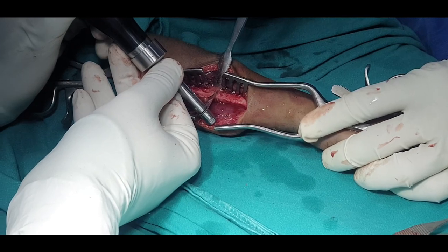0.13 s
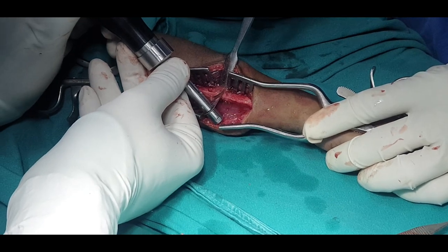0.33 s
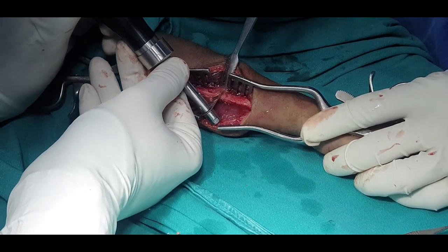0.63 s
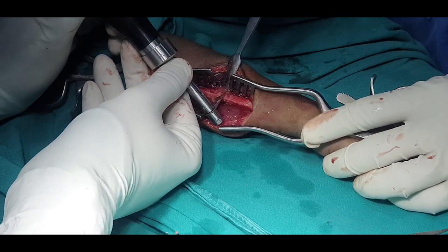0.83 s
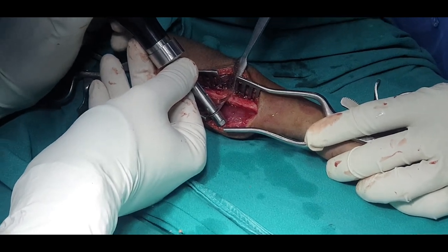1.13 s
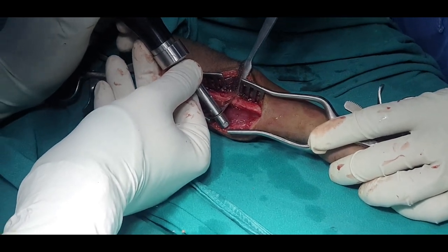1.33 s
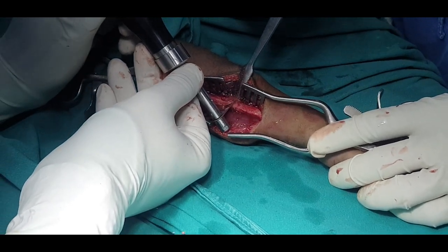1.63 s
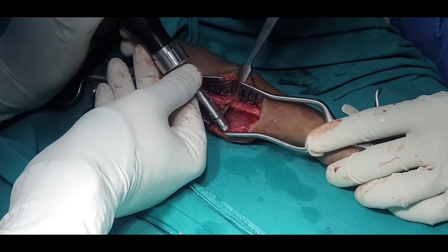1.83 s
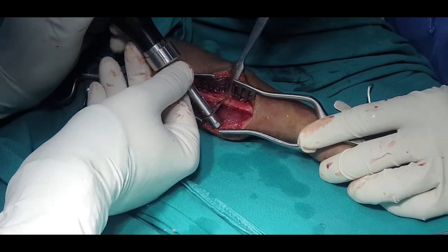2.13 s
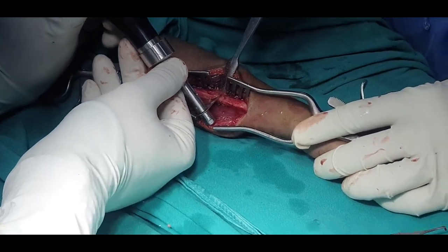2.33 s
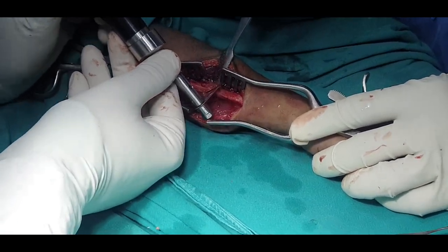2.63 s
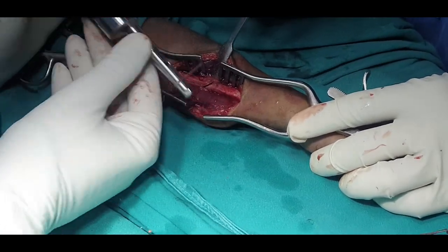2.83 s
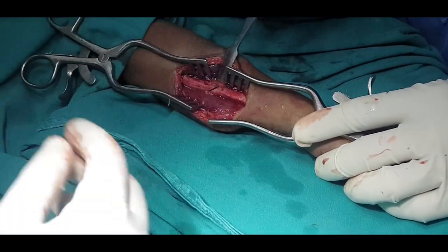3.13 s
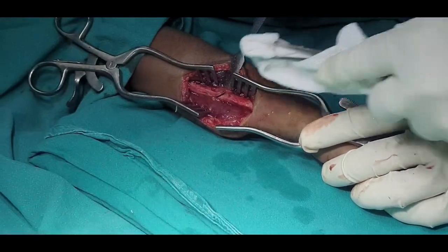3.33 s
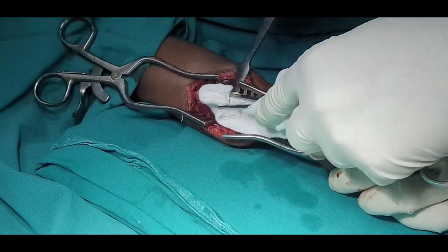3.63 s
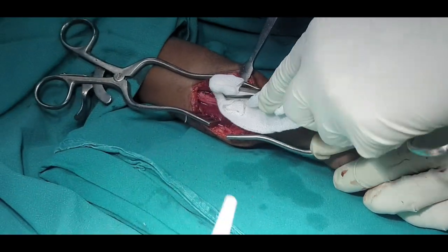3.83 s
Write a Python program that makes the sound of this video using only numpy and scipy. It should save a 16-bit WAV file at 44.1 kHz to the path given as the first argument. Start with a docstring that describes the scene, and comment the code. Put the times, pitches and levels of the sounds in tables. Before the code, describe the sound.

A powered surgical drill buzzes against bone in bursts, then whirs down with hissing air

```python
"""Air-driven surgical drill on bone

The drill runs close by and is pressed on bone four times firmly and once lightly: pulses timed by the rotor's
turns make the bright buzz, the motor sags, and coloured noise adds a screech and the hiss of exhaust air.
On release the rotor coasts down in pitch and level and the air bleeds away.
Beneath lie short, soft low swells, ventilation noise and a throbbing hum; sparse reflections follow the drill."""
import sys
import numpy as np
from scipy import signal
from scipy.fft import rfft, irfft
from scipy.io import wavfile
from scipy.ndimage import uniform_filter1d

SR = 44100
rng = np.random.default_rng(int(sys.argv[2]) if len(sys.argv) > 2 else 0)


def persist_wave(psi):
    """Save psi, clipped to +-1, as 16-bit WAV."""
    counts = np.round(np.clip(psi, -1, 1) * 32767).astype(np.int16)
    wavfile.write(sys.argv[1], SR, np.atleast_2d(counts).T)


N = 176400
T = np.arange(N) / SR
RELEASE_S = 3.16  # trigger let go


def amp(db):
    """Decibels to gain."""
    return 10 ** (np.asarray(db) / 20)


def curve(points):
    """A control joined by straight lines in time."""
    return np.interp(T, *np.transpose(points))


def sides(table, at):
    """Left and right gain read from a table of levels."""
    x, left, right = np.transpose(table)
    return amp([np.interp(at, x, left), np.interp(at, x, right)])


def swell(centre_s, width_s):
    """Bell-shaped rise and fall around a moment."""
    return np.exp(-.5 * ((T - centre_s) / width_s) ** 2)


def wander(rate_hz):
    """Slow random drift of unit RMS: noise under a Gaussian low-pass, computed at a coarse step."""
    step = 2 ** 5
    count = N // step + 2
    hz = np.fft.rfftfreq(count, step / SR)
    lowpass = np.exp(-.5 * (hz / rate_hz) ** 2)
    drift = irfft(rfft(rng.standard_normal(count)) * lowpass)
    return np.interp(T, np.arange(len(drift)) * step / SR, drift / drift.std())


def air(table, same, patchy_db, size=1024):
    """Turbulence as coloured noise, partly alike on both sides, with smooth patches in time and pitch."""
    frames, hz = N * 4 // size + 5, np.fft.rfftfreq(size, 1 / SR)
    a, b, c, d, patches = rng.standard_normal((frames, size // 2 + 1, 5)).T
    for axis in (0, 1):
        patches = uniform_filter1d(patches, size=10, axis=axis)
    same = np.clip(same, -1, 1)
    left = a + 1j * b
    right = same * left + np.sqrt(1 - same ** 2) * (c + 1j * d)
    spectrum = np.array([left, right]) * sides(table, hz)[:, :, None]
    spectrum *= amp(patchy_db * patches / patches.std())
    noise = signal.istft(spectrum, nperseg=size, noverlap=size * 3 // 4)[1][:, :N]
    return np.sqrt(2 ** 11 / size) * noise  # same loudness for any frame size


def theatre():
    """Operating room: lumpy ventilation rumble and a throbbing machine hum."""
    # ventilation spectrum: f/Hz, left level/dB, right level/dB, before its wavering
    vent = [(20, -94, -90), (54.6, -70, -68.5), (86.5, -74, -59), (114.5, -54.5, -53.5), (150, -80, -63),
            (200, -66.5, -63.5), (280, -97, -93.5), (433, -86, -79.5), (650, -101, -98.5),
            (1290, -104, -107), (4000, -96, -99), (15000, -98, -100)]
    rumble = air(vent, same=.55, patchy_db=1.5, size=4096) * amp(3.94 * wander(17))

    hum_hz, throb_hz, throb_depth = 100.6, 16.4, 0.94
    throb = 1 + throb_depth * np.cos(2 * np.pi * throb_hz * T + 1.4 * wander(4.9))
    level = amp(-52 + 1.86 * wander(12)) * throb
    hum = level * np.sin(2 * np.pi * hum_hz * T + 0.48 * wander(6.1))
    return rumble + hum * amp([[-4.5], [2]])  # hum leans right


def low_swells():
    """Short, soft low swells in the room noise: low tones under a bell envelope, stronger on the right."""
    # swells: t/s, right-side level/dB, f/Hz
    moments = [(.06, -44.5, 364), (.61, -46.5, 278), (.651, -43.5, 200), (.957, -41.5, 185),
               (1.03, -48.5, 364), (1.334, -46, 207), (1.597, -45.5, 202), (1.661, -44, 357),
               (1.93, -44, 184), (1.987, -44.5, 315), (2.13, -50, 249), (2.191, -45.5, 338)]
    width_s = 0.011
    swells = sum(amp(db) * swell(s, width_s) * np.sin(2 * np.pi * hz * (T - s)) for s, db, hz in moments)
    return swells * amp([[-6], [0]])


def speed():
    """Turns per second: the motor sags under load and slows exponentially after the release."""
    # rotor speed before the coast-down: t/s, f/Hz (turns per second)
    turn_rate = [(0, 487.8), (0.23, 487.5), (0.32, 482.2), (0.4, 480.5), (0.47, 480.7), (0.52, 487.5),
                 (0.7, 489.0), (0.8, 482.5), (0.9, 480.5), (1.0, 484.7), (1.16, 488.3), (1.26, 483.4),
                 (1.4, 479.9), (1.72, 477.7), (1.97, 477.2), (2.04, 485.7), (2.13, 490.9), (2.25, 490.4),
                 (2.4, 480.1), (2.55, 476.6), (2.67, 477.2), (2.72, 486.1), (2.8, 490.7), (3.05, 493.0),
                 (3.16, 491.2)]
    coast_s = 0.95
    return curve(turn_rate) * np.exp(-np.maximum(T - RELEASE_S, 0) / coast_s)


def rotor(jitter=0.00072):
    """Turns made so far: the slightly unsteady speed summed over time."""
    return np.cumsum(speed() * (1 + jitter * wander(70))) / SR


def contact():
    """Force of the bur on the bone, ramping in as it bites and out as it lifts."""
    # presses: start t/s, start of lift t/s, level/dB, lift time/s
    presses = [(0.197, 0.44, 0, 0.056), (0.666, 0.883, -.5, 0.12), (1.145, 1.871, 2, 0.16),
               (2.242, 2.633, -.5, 0.067), (2.728, 2.8, -7, 0.035)]
    bite_s = 0.072
    force = 0
    for start, end, db, lift in presses:
        bite = np.clip((T - start) / bite_s, 0, 1)
        force = force + amp(db) * bite * np.clip(1 - (T - end) / lift, 0, 1)
    return force


def thinned(hiss, size=1024):
    """Thins the lower hiss between multiples of the speed, more under load, until the end time."""
    thin_db, thin_load_db = -11, -14
    thin_end_s, thin_fade_s = 3.6, .35
    thin_top_hz = 3480  # untouched above this
    hz, t, spectrum = signal.stft(hiss, SR, nperseg=size, noverlap=size * 3 // 4)
    cut_db = (thin_db + thin_load_db * contact()) * np.clip((thin_end_s - T) / thin_fade_s, 0, 1)
    between = np.sin(np.pi * hz[:, None] / np.interp(t, T, speed())) ** 2  # 0 on a multiple, 1 midway
    reach = np.clip(2 - 2 * hz / thin_top_hz, 0, 1)[:, None]
    spectrum = spectrum * amp(np.interp(t, T, cut_db) * reach * between)
    return signal.istft(spectrum, SR, nperseg=size, noverlap=size * 3 // 4)[1][:, :N]


def exhaust():
    """Hiss of spent air, a bright band swelling as the drill turns away, then a thinner bleed-off."""
    # spectra before flow, thinning and fades: f/Hz, left level/dB, right level/dB
    full_flow = [(700, -135, -141), (1356, -78, -77), (1820, -75, -58.5), (2100, -78, -54.5),
                 (3150, -60, -59), (3090, -58, -57), (4110, -76, -46.5), (4750, -56, -53), (5300, -69, -51),
                 (5900, -61.5, -52), (7230, -60, -52), (8070, -72, -52), (8830, -48.5, -59.5),
                 (9430, -44.5, -54), (10730, -54.5, -53.5), (12000, -54, -53), (13100, -59, -57.5),
                 (15300, -61, -69)]
    emptying = [(616, -70, -65), (1350, -84, -70.5), (2100, -70.5, -64.5), (3740, -74, -64.5),
                (4250, -70, -52), (5180, -73, -61.5), (6300, -77, -62), (7240, -71, -61),
                (8200, -77, -71.5), (9500, -62, -73), (10500, -77, -73), (11600, -66, -62),
                (12400, -72, -78), (14300, -80, -79)]
    drawn_away = [(5200, -100, -92), (6130, -78, -48), (7000, -50, -44), (7040, -56, -68), (8100, -99, -87)]
    # flow of air: t/s, level/dB
    flow_level = [(0, 2), (1.25, 2.5), (1.6, 0.5), (2.0, 1), (2.8, 2.5), (3.15, 0.5), (3.27, -3.5),
                  (3.45, -7.5), (3.6, -17), (4, -34)]
    bleed_db, bleed_db_per_s = -3, 10.5  # level at 4 s, and its fall
    onset = np.clip((T - RELEASE_S) / 0.17, 0, 1) ** 2
    bleeding = onset * amp(bleed_db - bleed_db_per_s * (T - 4.0))
    flow = amp(curve(flow_level) + .5 * wander(23))
    hiss = flow * air(full_flow, same=0.04, patchy_db=2.0)
    hiss += bleeding * air(emptying, same=0.12, patchy_db=2.5)
    turned = swell(3.08, 0.13) * air(drawn_away, same=0.16, patchy_db=2.0)
    return thinned(hiss) + turned


def room(x):
    """Sparse random reflections, the treble dying first."""
    # decay of the reflections: f/Hz, t60/s
    decay = [(300, 0.34), (3000, 0.26), (14000, 0.045)]
    taps = rng.choice([-1., 1.], (2, SR)) * (rng.random((2, SR)) < 3000 / SR)  # about 3000 a second
    taps *= T[:SR] > .003
    hz, t, spectrum = signal.stft(taps, SR, nperseg=256)
    t60 = np.interp(hz, *np.transpose(decay))[:, None]
    tail = signal.istft(spectrum * amp(-60 * t / t60), SR, nperseg=256)[1]
    return signal.fftconvolve(x, tail / np.linalg.norm(tail[0]), axes=1)[:, :N]


def pulses(turns, gains, waver_db, waver_hz, scatter, fuzz, fuzz_hz, count):
    """Once-a-turn pulses as a sum of multiples, each slightly blurred by random wavering."""
    # the moving hand shifts the tones between the sides, the higher multiples more
    drift_rad, drift_multiple, drift_hz = 0.98, 11, 1.2
    out = np.zeros((2, N))
    for k in range(count):
        wave = amp(waver_db * wander(waver_hz)) * np.exp(2j * np.pi * (k + 1) * turns)
        wave = wave * (1 + fuzz * (wander(fuzz_hz) + 1j * wander(fuzz_hz)))
        drift = drift_rad * np.tanh((k + 1) / drift_multiple) * wander(drift_hz)
        lag = scatter * rng.standard_normal() + np.array([drift, -drift])
        out += gains(k) * (wave * np.exp(1j * lag)).real
    return out


def motor(turns):
    """Vanes chop the air, a whine rises shortly before the release, and upper tones die first in the coast."""
    # multiples 1, 2, 3.. of the speed, before trim, load and coast: left level/dB, right level/dB
    tones = [(-57, -48), (-47.5, -50), (-53, -47.5), (-48, -42.5), (-47, -41), (-50, -44.5), (-60, -42),
             (-48, -37), (-60, -34.5), (-50, -38), (-51, -43)]
    # whine of the eighth multiple before the coast: t/s, right-side level/dB
    whine_level = [(0, -71), (2.75, -42), (3.03, -24.5), (3.16, -24), (3.2, -32), (3.4, -52)]
    coast_db_per_s, coast_db_per_multiple_s = 22, 15
    clear_s, clear_db, clear_fade_s = 2.674, -14.5, 0.22  # lowest tone weakens as the drill is drawn clear
    coasting = np.maximum(T - RELEASE_S, 0)
    clearing_db = clear_db * np.clip((T - clear_s) / clear_fade_s, 0, 1)

    def colour(k):
        """Level of one multiple on each side."""
        fade_db = clearing_db * (k == 0) - coast_db_per_multiple_s * k * coasting
        return amp(tones[k])[:, None] * amp(fade_db)

    tone = pulses(turns, colour, waver_db=2.1, waver_hz=11, scatter=1.99, fuzz=0.38, fuzz_hz=28.7,
                  count=len(tones))
    tone *= amp(-0.5 + contact())  # about a decibel louder under load
    whine = amp(curve(whine_level)) * np.cos(2 * np.pi * 8 * turns)
    return (tone + whine * amp([[-13], [0]])) * amp(-coast_db_per_s * coasting)


def bur(turns, rough=0.11):
    """Uneven strikes on bone, a buzz blending between two colours, with a grinding screech and squeaks."""
    # blend of the buzz: t/s, share of the second colour (0 to 1)
    colour_blend = [(0, 0.79), (1.58, 0.041), (1.8, 1), (2.3, 0.12), (2.52, 1)]
    # buzz at multiples 1, 2, 3.. of the speed, before trim and force: left level/dB, right level/dB
    first_colour = [(-55, -47), (-48, -45), (-49, -45), (-43, -32), (-49, -41), (-50, -35), (-45, -35),
                    (-51, -46), (-48, -33), (-53, -31), (-45, -32), (-43, -31), (-42, -31), (-43, -30),
                    (-50, -35), (-53, -40), (-47, -41), (-28, -45), (-21, -41), (-32, -34), (-28, -44),
                    (-27, -31), (-29, -32), (-44, -34), (-36, -39), (-38, -34), (-41, -36), (-43, -40),
                    (-44, -49), (-43, -44)]
    second_colour = [(-54, -45), (-46, -44), (-46, -43), (-43, -33), (-43, -35), (-47, -35), (-45, -36),
                     (-50, -40), (-46, -30), (-55, -34), (-48, -30), (-40, -34), (-44, -38), (-46, -28),
                     (-48, -37), (-45, -32), (-41, -41), (-40, -44), (-26, -42), (-26, -39), (-25, -40),
                     (-26, -32), (-32, -30), (-35, -34), (-38, -35), (-40, -38), (-44, -37), (-37, -35),
                     (-41, -36), (-43, -43)]
    # screech of ground bone, before force: f/Hz, left level/dB, right level/dB
    screech_colour = [(3000, -112.5, -104.5), (5800, -69, -75), (8200, -61, -57), (9250, -57, -66),
                      (9800, -43.5, -74), (11200, -66, -67), (14300, -58, -58)]
    # squeaks as the bur skids: t/s, right-side level/dB
    skids = [(1.005, -27), (1.972, -22)]
    squeak_hz, squeak_s = 4353, 0.0067
    blend = curve(colour_blend)

    def colour(k):
        """Level of one multiple on each side, between the two colours."""
        return sides([(0, *first_colour[k]), (1, *second_colour[k])], blend)

    buzz = pulses(turns, colour, waver_db=1.25, waver_hz=3.5, scatter=0.92, fuzz=0.21, fuzz_hz=37.7,
                  count=len(second_colour))
    buzz *= amp(-0.5) * (1 + rough * wander(61))
    once_a_turn = 1 + .5 * np.cos(2 * np.pi * turns)
    screech = air(screech_colour, same=0.033, patchy_db=-4.0) * once_a_turn
    squeaks = sum(amp(db) * swell(s, squeak_s) for s, db in skids) * np.sin(2 * np.pi * squeak_hz * T)
    return contact() * (buzz + screech) + squeaks * amp([[-12], [0]])


def scene():
    """Room tone, low swells and air around the drill and its reflections."""
    turns = rotor()  # bur and motor share one shaft
    drill = motor(turns) + bur(turns)
    return theatre() + low_swells() + exhaust() + amp(-8.5) * room(drill) + drill


def record(dry):
    """The recorder's band limit: a steep low-pass."""
    edge_hz = 14540
    lowpass = signal.firwin(1501, edge_hz, window=("kaiser", 9), fs=SR)
    return signal.oaconvolve(dry, lowpass[None], "same")


dry = scene()
out = record(dry)
persist_wave(out)
```